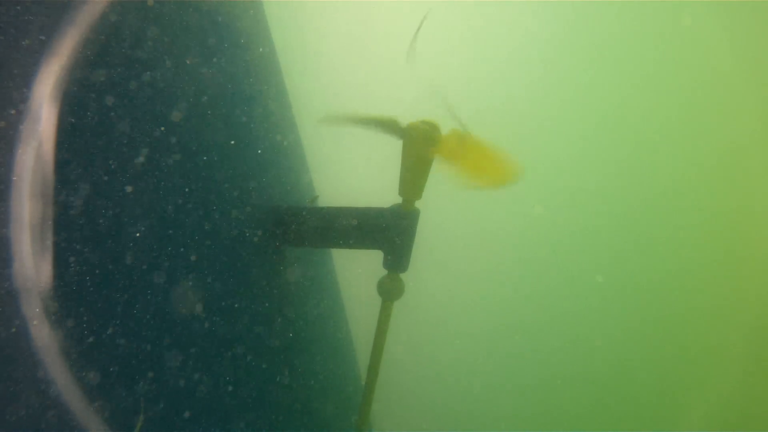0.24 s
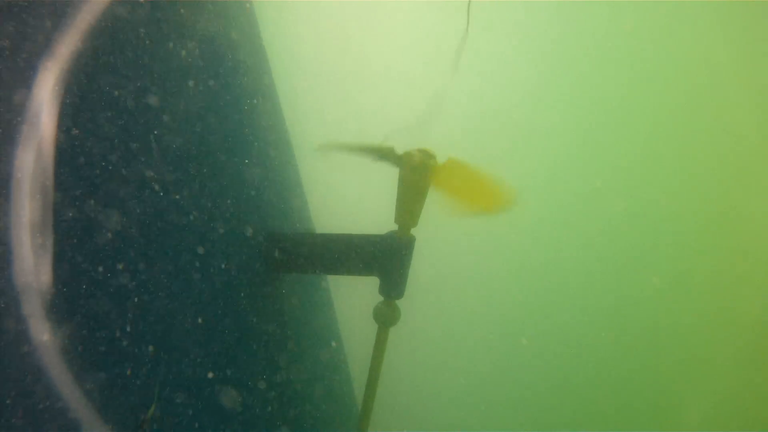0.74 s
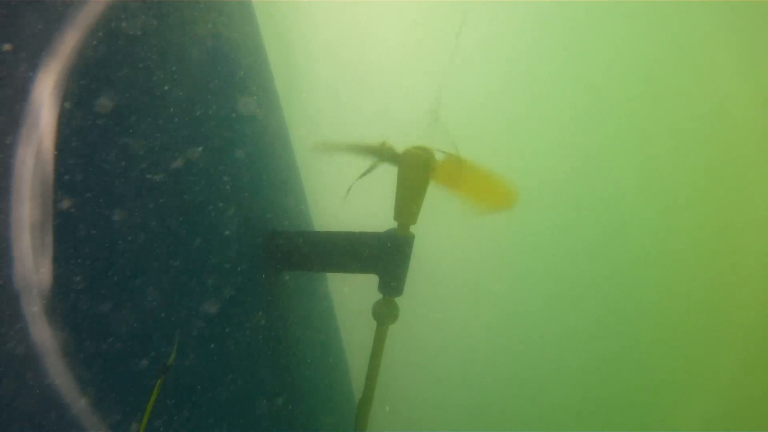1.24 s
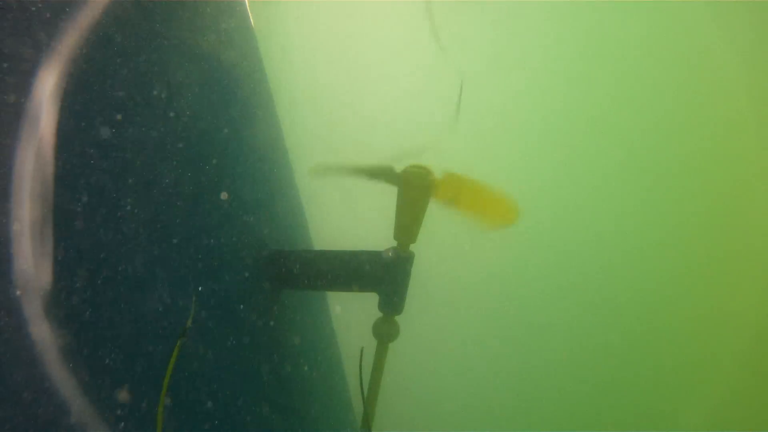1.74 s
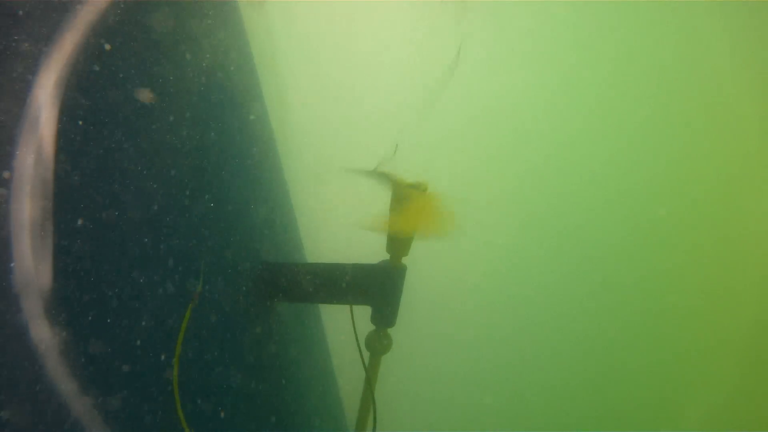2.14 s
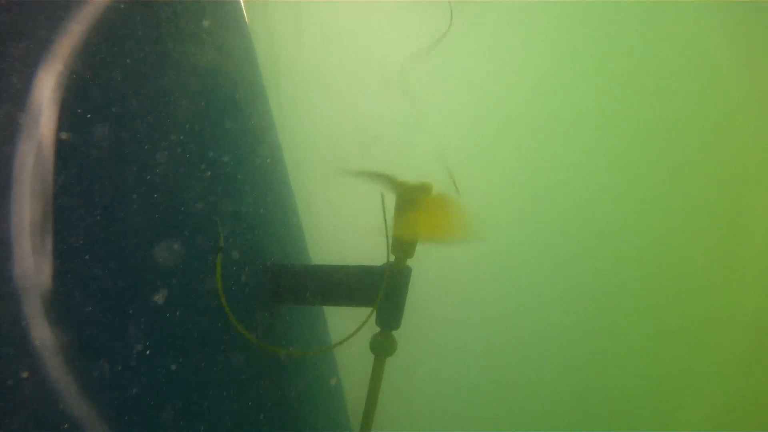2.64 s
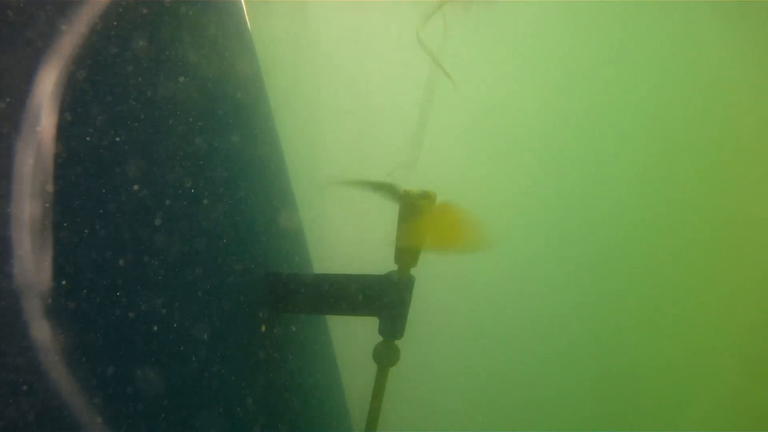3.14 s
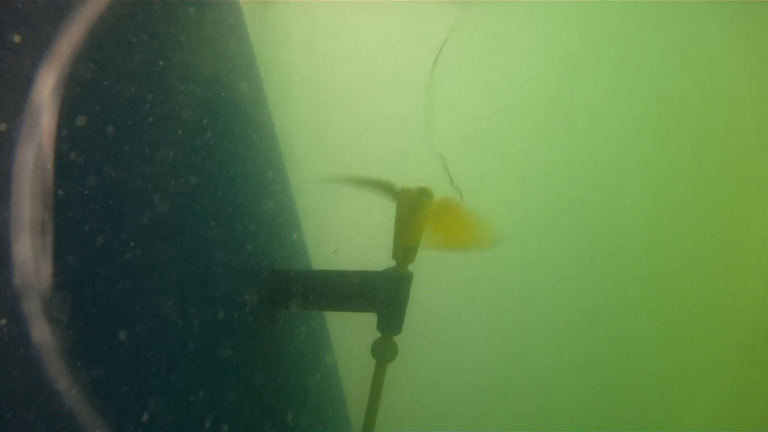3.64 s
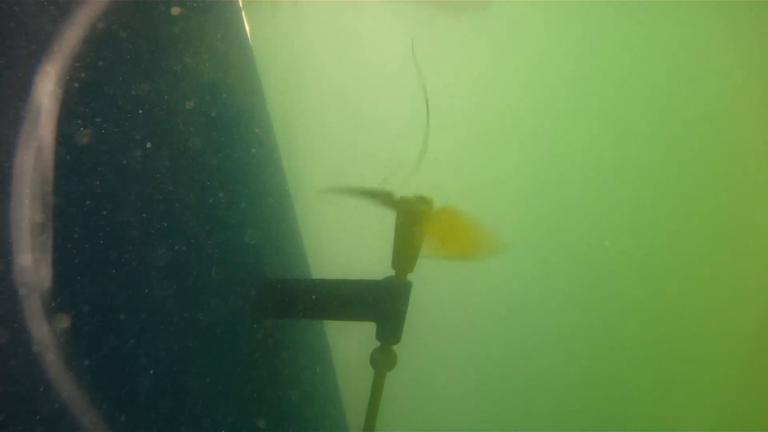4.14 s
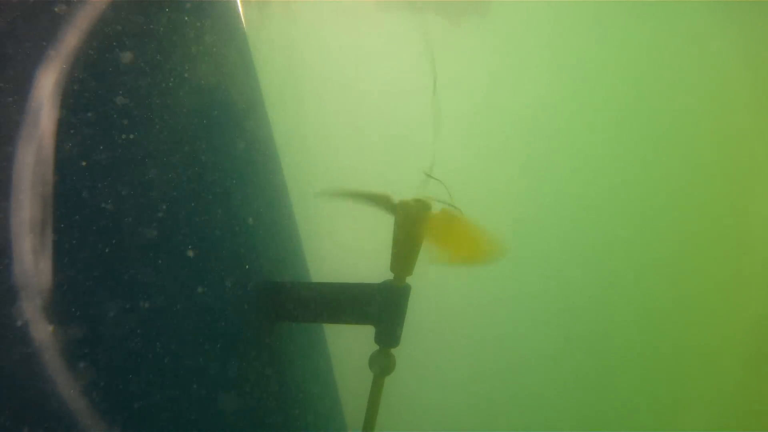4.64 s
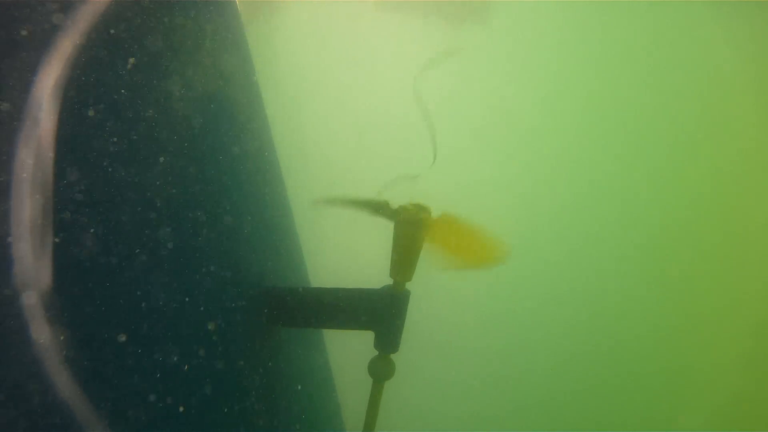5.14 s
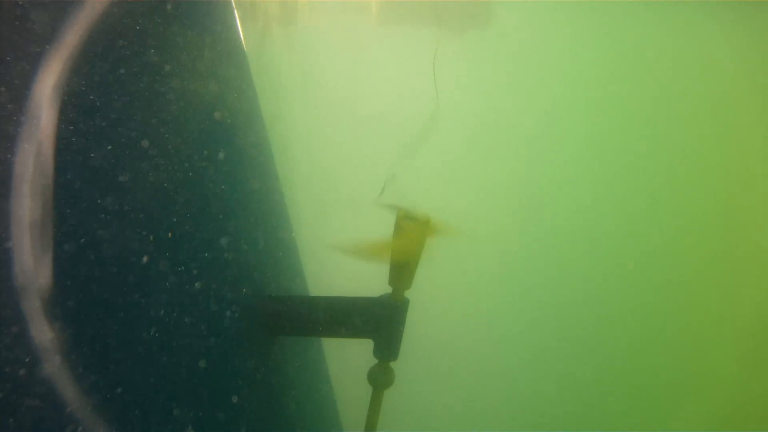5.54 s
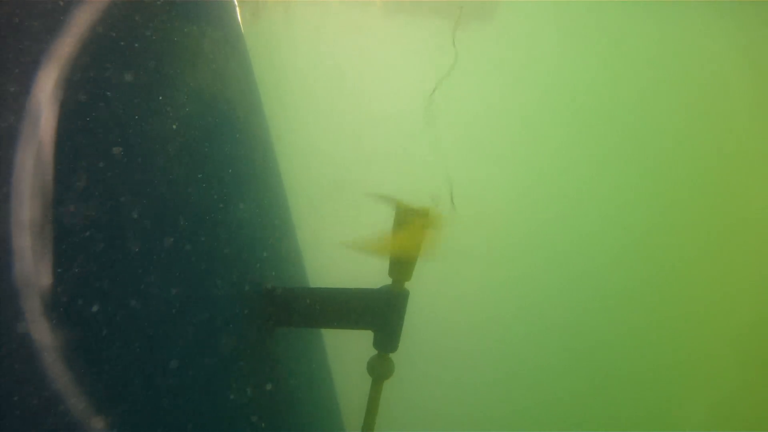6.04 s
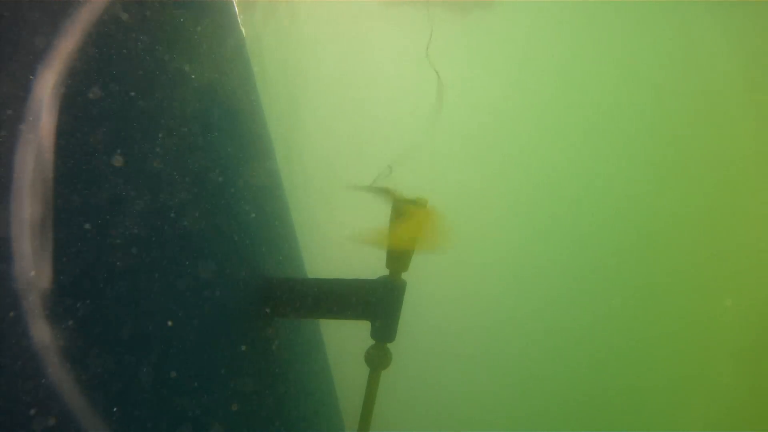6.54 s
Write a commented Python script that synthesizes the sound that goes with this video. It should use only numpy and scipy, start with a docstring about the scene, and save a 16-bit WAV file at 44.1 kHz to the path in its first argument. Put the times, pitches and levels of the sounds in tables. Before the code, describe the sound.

Heard underwater, a boat engine drones steadily while its propeller throbs and crackles with tiny collapsing bubbles.

```python
"""A throbbing, gritty rattle over a low drone: a motor boat at a steady speed, heard under water
from a camera fixed to its hull. As the propeller turns, air pockets at the blades throb, and clouds
of tiny bubbles collapse (cavitation) and rattle the camera's housing. The engine drones through
the hull and the passing water rumbles. The camera holds each sample of a low sampling rate,
which mirrors the sound into a gritty treble."""
import sys
import numpy as np
from scipy import signal
from scipy.fft import rfft, irfft, next_fast_len
from scipy.io import wavfile
from scipy.ndimage import uniform_filter1d

SR = 44100
rng = np.random.default_rng(int(sys.argv[2]) if len(sys.argv) > 2 else 0)


def dump(signal):
    """Clip the signal to [-1, 1] and save it as 16-bit WAV at the path in sys.argv[1]."""
    limited = np.clip(np.atleast_2d(signal).T, -1, 1)
    pcm = np.round(limited * 32767).astype(np.int16)
    wavfile.write(sys.argv[1], SR, pcm)


N = 298998

SHAFT_HZ = 12.95   # propeller turns per second
# The two blades: where it meets air/turns, rise of the air pockets/dB, chance of a throb,
# where it sheds bubbles/turns, rise of the bubbles/dB
BLADES = [(.2, 4.5, .5, 0.15, 1.9), (.82, 2.2, .2, .66, 3)]


def air_pockets(level_db):
    """Swirling water shakes the air pockets; wide swings lose energy, which evens out their loudness."""
    # Ringing of the pockets: f/Hz, width/Hz, relative level/dB
    rings = [(580.7, 67, -0.5), (682.3, 110, 0.5), (801.5, 143, -7), (511.4, 97, -9.5)]
    swing = rms_one(sum(from_db(db) * resonate(rng.standard_normal(N), hz, width)
                        for hz, width, db in rings))
    power = uniform_filter1d(swing ** 2, int(0.023 * SR)) + 1e-9   # averaged over 23 ms
    evenness = 0.47   # 0 leaves the swings alone, 1 levels them
    return from_db(level_db) * rms_one(swing / power ** (evenness / 2))


def blade_throbs():
    """A blade that meets air may trap a large pocket. Gives rows of t/s, peak/dB, f/Hz, swell/s."""
    rows = []
    for turn in range(int(N / SR * SHAFT_HZ) + 1):
        for _ in [None]:
            for place, _, chance, _, _ in BLADES:
                luck, length = rng.random(2)
                late, loud, high = rng.uniform(-0.988, 1, 3)
                doublings = 1.54 * length ** 2   # how many times the shortest swell is doubled
                if luck < chance:
                    s = (turn + place + 0.1203 * late) / SHAFT_HZ
                    db = -6.5 - 1.44 * doublings + 0.7 * loud   # long throbs are weaker
                    rows.append((s, db, 652 + 70 * high, 0.0035 * 2 ** doublings))
    return rows


def throbs(churn, takeover, hush_s):
    """One large pocket takes over from the churning, swells and dies away within a few swings."""
    # The throbs that stand out: start t/s, peak level/dB, f/Hz
    strong_throbs = [(0.371, -4, 573), (0.694, -6, 635), (1.24, -5, 584), (1.391, -4, 689),
                     (2.668, -6, 659), (3.071, -4, 684), (3.1, -6, 651), (3.255, -4, 654), (3.46, -4, 665),
                     (3.534, -6, 606), (3.848, -6, 665), (3.921, -5, 665), (4.026, -2, 587),
                     (5.308, -3, 670), (5.572, -3, 587), (6.357, -5, 694), (6.541, -4, 571)]
    rise_s = 0.0025
    strong = [(s + rise_s, db, hz, rise_s) for s, db, hz in strong_throbs]
    churn_gain, out = np.ones(N), np.zeros(N)
    for s, db, hz, swell_s in blade_throbs() + strong:
        near, t = around(s)
        swell = np.exp(-(t / swell_s) ** 2)
        tone = np.sin(2 * np.pi * (hz * t + rng.random()))
        churn_gain[near] *= 1 - takeover * np.exp(-(t / (swell_s + hush_s)) ** 2)
        out[near] = (1 - swell) * out[near] + from_db(db) * swell * tone
    return churn_gain * churn + out


def cavitation(level_db, per_s):
    """The blades shed clouds of tiny bubbles; each one collapses with a click."""
    clicks = rng.random(N) < per_s / SR
    sizes = from_db(1.6 * np.minimum(rng.exponential(1, N), 4)) * rng.choice([-1, 1], N)
    clumps = from_db(1.17 * drift(rate_hz=22.5))
    return from_db(level_db) * rms_one(housing(clicks * sizes * clumps))


def cracks(extra_load_db, small_per_s, build_s, stop_s):
    """A whole cloud collapses in a chain that builds up and stops short; more often under load."""
    # Collapses of large clouds: start t/s, strength/dB
    large = [(0.35, -6), (1.3574, -10), (1.682, -6), (1.8162, -4), (2.594, -6), (2.9995, -4), (3.5951, -7),
             (3.9842, -6), (4.5999, -8), (4.9825, -8), (5.5332, -7), (6.6193, -6)]
    happens = rng.random(N) < small_per_s * from_db(extra_load_db) ** 2 / SR
    small = [(s, -11) for s in clock()[happens]]
    power = np.zeros(N)
    for s, db in list(large) + small:
        near, t = around(s + 0.003)   # the peak comes 3 ms after the start
        power[near] += from_db(db + 3.5) ** 2 * np.exp(np.minimum(t / build_s, -t / stop_s))
    return housing(np.sqrt(power) * rng.standard_normal(N))


def housing(pulses):
    """Pulses ring in the hull and the camera's housing; where they land decides which pitches ring."""
    # Ringing of hull and housing: f/Hz, width/Hz, gain/dB
    rings = [(1375, 106, -5), (1381, 325, -1), (1840, 100, -1), (2239, 274, 4), (2339, 126, -7),
             (2762, 196, -3.5), (3415, 536, -8), (3400, 200, -13), (4690, 1630, -18.5)]
    # Pitches where echoes in the hull cancel: f/Hz, width/Hz
    hollows = [(1030, 32), (2570, 29), (3120, 120), (3920, 290)]
    out = 0
    for hz, width, db in rings:
        landing = from_db(1.5 * drift(rate_hz=165))
        out += from_db(db) * resonate(pulses * landing, hz, width)
    for hz, width in hollows:
        out = signal.lfilter(*signal.iirnotch(hz, hz / width, fs=SR), out)
    return out


def engine(cycle_hz, unsteady_db):
    """Each four-stroke cycle brings two pressure thumps and a few knocks of uneven strength."""
    # Thumps of the firings: place/cycles, peak level/dB, half length/s
    firings = [(.21, -24, 0.0042), (0.746, -21.5, 0.0055)]
    # Knocks that ring in the hull: place/cycles, typical level/dB, f/Hz, decay/s
    knocks = [(0.113, -27.5, 139, 0.0094), (0.298, -24.5, 249, 0.0057), (0.87, -21, 116, 0.0035),
              (.27, -24, 480, 0.012)]
    cycle, out = cycle_hz * clock(), 0
    for place, db, half_s in firings:
        t = ((cycle - place + .5) % 1 - .5) / cycle_hz
        out += from_db(db) * np.exp(-(t / half_s) ** 2)
    for place, db, hz, decay_s in knocks:
        t = (cycle - place) % 1 / cycle_hz
        strength = from_db(db + unsteady_db * drift(rate_hz=18))
        out += strength * np.exp(-t / decay_s) * np.sin(2 * np.pi * hz * t)
    return signal.sosfilt(signal.butter(1, 12, "high", fs=SR, output="sos"), out - out.mean())


def machinery(wander_s, waver_db):
    """Shaft, gears and hull hum with tones that share one slightly wandering speed."""
    # Tones of the hum: f/Hz, typical level/dB
    tones = [(25.9, -38), (52, -43.5), (56.7, -44.5), (123.2, -48.5), (184.8, -49), (200.1, -43.5),
             (277.1, -49), (439.2, -45), (510.9, -39), (523.5, -33), (569.9, -32.5)]
    t = clock() + wander_s * drift(rate_hz=0.43)
    waver, out = drift(rate_hz=2.8), 0
    for hz, db in tones:
        gain = from_db(db + waver_db * np.roll(waver, rng.integers(N)))   # each tone swells on its own
        out += np.sqrt(2) * gain * np.sin(2 * np.pi * (hz * t + rng.random()))
    return out


def water_flow(level_db):
    """Water rushing past makes a low rumbling noise."""
    # Tone colour of the rumble: f/Hz, relative level/dB
    spectrum = [(12, -22), (22, -33), (40, -43), (80, 0), (125, -1.5), (180, -5.5), (250, -9), (350, -4),
                (450, -2), (1000, -15), (2000, -23)]
    points_hz, db = np.transpose(spectrum)
    rumble = shaped_noise(lambda hz: from_db(np.interp(np.log(hz + 1e-9), np.log(points_hz), db)))
    return from_db(level_db) * rumble


def hull_boom(level_db, hz, width_hz, evenness):
    """The wake keeps the hull swinging at one low pitch."""
    swing = signal.hilbert(resonate(rng.standard_normal(next_fast_len(N)), hz, width_hz))[:N]
    loudness = np.abs(swing) + 1e-6
    return from_db(level_db) * rms_one(swing.real / loudness ** evenness)


def blade_rise(places, rises_db, spread_turns):
    """The level rises smoothly, in dB, as each blade comes round to its place in the turn."""
    turn = SHAFT_HZ * clock()
    return sum(db * np.exp(-(((turn - place + .5) % 1 - .5) / spread_turns) ** 2)
               for place, db in zip(places, rises_db))


def from_db(db):
    """Turn decibels into a gain."""
    return 10 ** (np.asarray(db) / 20)


def rms_one(x):
    """Scale to an average power of 1."""
    return x / np.sqrt(np.mean(x ** 2) + 1e-20)


def clock():
    """The time of every sample, in seconds."""
    return np.arange(N) / SR


def around(s):
    """The samples within 50 ms of a moment, and their times from it."""
    middle, span = int(s * SR), SR // 20
    near = np.arange(max(middle - span, 0), min(middle + span, N))
    return near, near / SR - s


def shaped_noise(gain_at):
    """Noise of power 1, with each frequency weighted by gain_at(hz)."""
    size = next_fast_len(N)
    hz = np.arange(size // 2 + 1) * SR / size
    return rms_one(irfft(rfft(rng.standard_normal(size)) * gain_at(hz), size)[:N])


def drift(rate_hz):
    """A random wander of typical size 1, mostly slower than the given rate."""
    return shaped_noise(lambda hz: np.exp(-(hz / rate_hz) ** 2))


def resonate(x, hz, width_hz):
    """Keep one band of frequencies, so that the sound rings there."""
    edges = [max(hz - width_hz / 2, 20), hz + width_hz / 2]
    return signal.sosfilt(signal.butter(2, edges, "band", fs=SR, output="sos"), x + 1e-18)


def scene():
    """Propeller, engine and water as they reach the camera."""
    # Load on the propeller, as the base level of its bubbles: t/s, level/dB
    load_curve = [(0.0, -24.5), (0.96, -21.5), (1.04, -23.5), (1.84, -19.5), (2.64, -21), (2.88, -23),
                  (2.96, -20), (3.44, -23.5), (3.6, -20.5), (4.08, -23), (4.4, -20.4), (4.72, -22),
                  (4.96, -19), (5.36, -23), (5.52, -22), (5.68, -22.5), (5.84, -20.2), (6.76, -23)]
    # Swelling of the hull's low boom: t/s, level/dB
    boom_curve = [(0.0, -40), (0.32, -28.5), (0.72, -37), (1.36, -30), (1.52, -40), (2.0, -29.5),
                  (3.28, -31), (4.8, -38), (4.96, -25), (5.44, -34.5), (5.68, -25), (6.24, -32.0),
                  (6.48, -25), (6.76, -32)]
    load_db = np.interp(clock(), *np.transpose(load_curve))
    boom_db = np.interp(clock(), *np.transpose(boom_curve))
    effort_db = load_db - load_db.mean()
    air_places, air_rises_db, _, cloud_places, cloud_rises_db = np.transpose(BLADES)
    pocket_db = -19.5 + 0.32 * effort_db + blade_rise(air_places, air_rises_db, spread_turns=0.19)
    cloud_db = load_db + blade_rise(cloud_places, cloud_rises_db, spread_turns=0.15)
    gulps_db = 1.29 * drift(rate_hz=23)   # air reaches the blades unevenly
    churn = air_pockets(pocket_db + gulps_db)
    bubbles = cavitation(cloud_db - 0.96, per_s=16000)
    collapses = cracks(cloud_db - cloud_db.mean(), small_per_s=4.6, build_s=0.005, stop_s=0.00076)
    water = water_flow(-28 + 0.88 * effort_db)
    boom = hull_boom(boom_db - 0.3, hz=62.4, width_hz=14, evenness=0.22)
    motor = engine(cycle_hz=15.395, unsteady_db=3)
    hum = machinery(wander_s=0.00057, waver_db=3)
    hum *= from_db(0.27 * (boom_db - boom_db.mean()))   # swells with the boom: the hull carries both
    pockets = throbs(churn, takeover=0.55, hush_s=0.0039)
    return (pockets + bubbles + collapses + motor + hum + water + boom)[None]


def record(dry):
    """The camera rounds off peaks and holds each slow sample, which mirrors the sound into the treble."""
    hold_hz, repeats, ceiling, cutoff_hz = 12000, 4, 0.92, 15280
    slow = signal.resample_poly(dry, hold_hz, SR, axis=1)
    slow = signal.sosfilt(signal.butter(1, 5700, fs=hold_hz, output="sos"), slow)
    rounded = slow / (1 + (slow / ceiling) ** 6) ** (1 / 6)
    steps = np.repeat(rounded, repeats, axis=1)
    held = signal.resample_poly(steps, SR, repeats * hold_hz, axis=1)[:, :N]
    return signal.sosfilt(signal.ellip(12, .1, 90, cutoff_hz, fs=SR, output="sos"), held)


dry = scene()
out = record(dry)
dump(out)
```